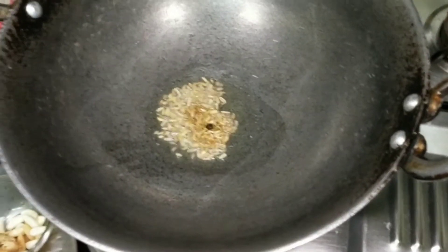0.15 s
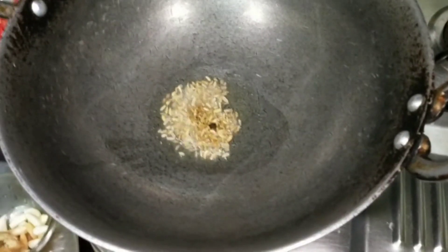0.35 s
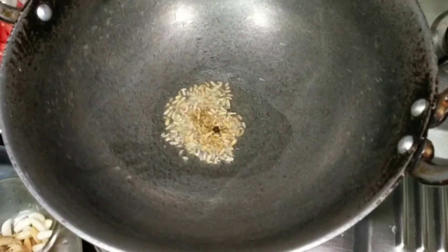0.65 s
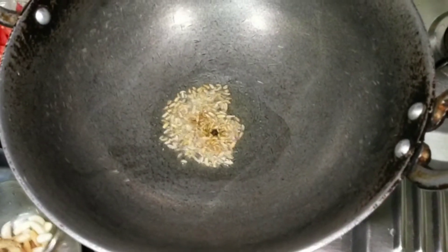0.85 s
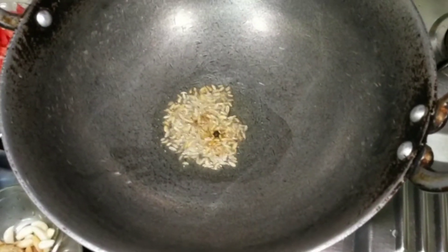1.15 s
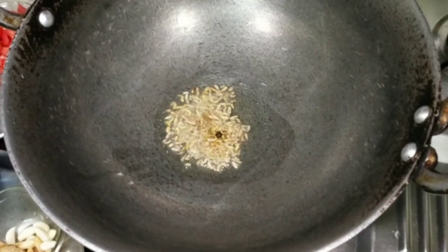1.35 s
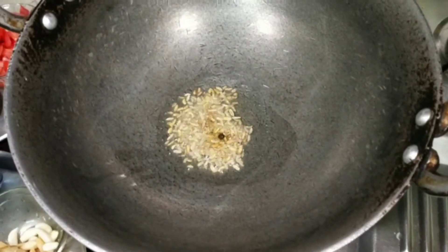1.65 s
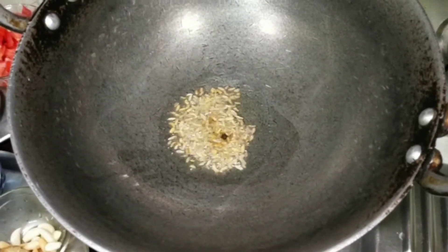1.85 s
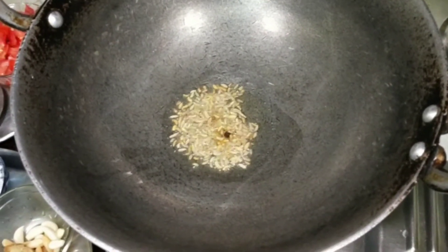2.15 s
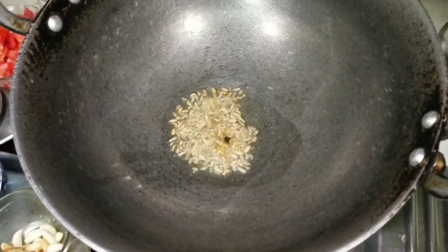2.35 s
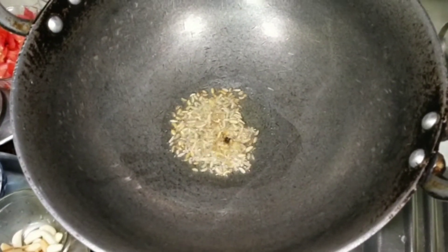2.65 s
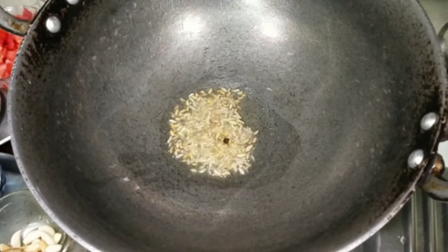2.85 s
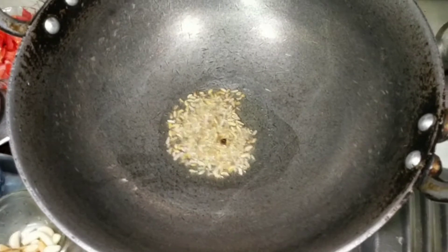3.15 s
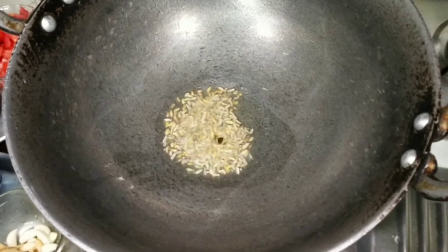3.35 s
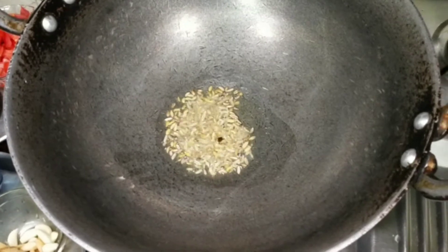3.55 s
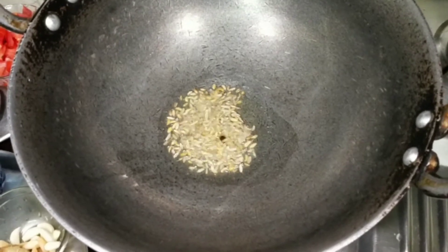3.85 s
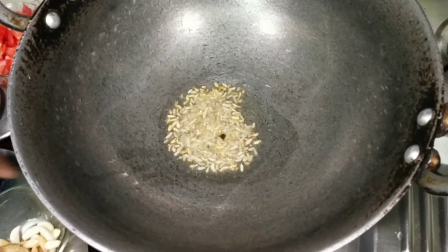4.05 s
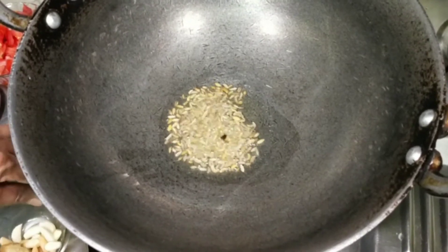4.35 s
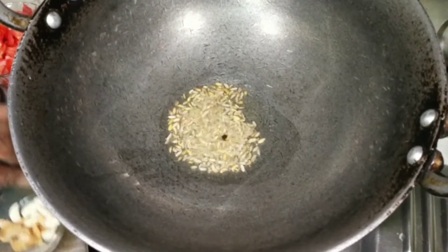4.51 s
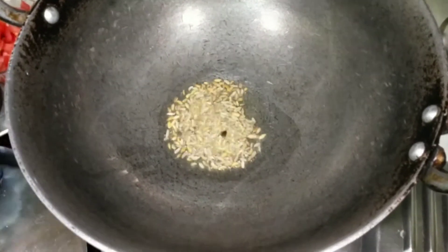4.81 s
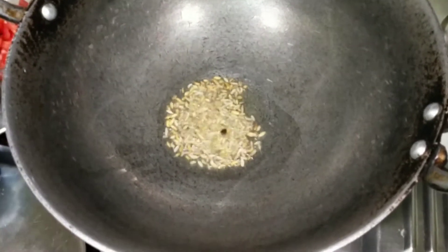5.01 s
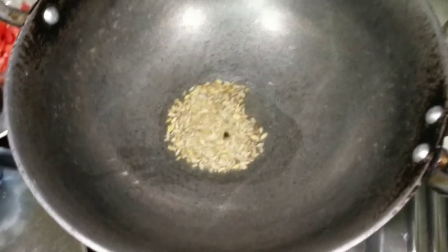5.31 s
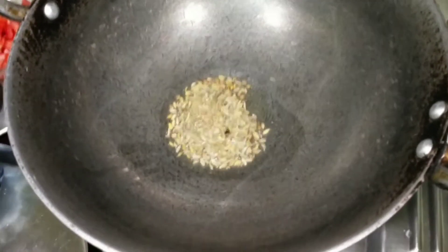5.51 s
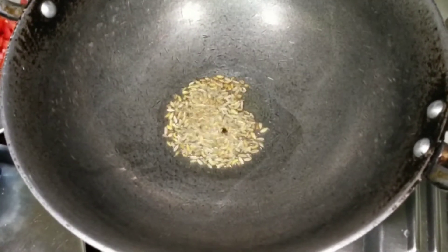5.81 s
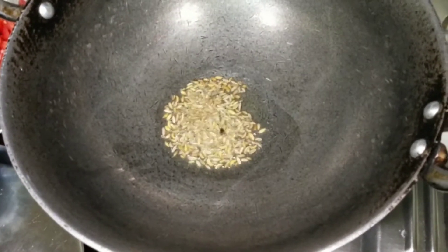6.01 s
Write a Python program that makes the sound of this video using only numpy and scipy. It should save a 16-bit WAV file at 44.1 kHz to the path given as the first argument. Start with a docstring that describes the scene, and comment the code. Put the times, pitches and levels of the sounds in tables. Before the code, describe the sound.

A small hard-walled kitchen, heard close in stereo, with very low room rumble and faint electric hum. Seeds in oil give a soft, dense, bright hiss for the whole six seconds, flickering slightly and growing very little. At 0 s a hard steel clank opens, with a brief rub, followed by plate and tray rattles and scrapes until about 0.6. Light spoon ticks come around 1.0 and 1.35; at 1.45 an oil bubble snaps sharply, much louder than the other tiny pops. A double fork tick falls at 1.74. Faint sliding leads to a strong pot clank at 2.4, then subdued scrapes and taps until 3.2. A small crisp tick sounds at 3.9, a ladle clatter at 4.3. At 5.1 a cup knocks and slides, with short hollow tugs, tray taps and a thin metallic scrape fading by 5.7, leaving the sizzle.

```python
"""Seeds in a wok, steelware beside it

Seeds sizzle faintly in hot oil: dense random clicks and filtered noise. Larger bubbles pop as single clicks.
Steel utensils and bowls knock (noise bursts over decaying modes), slide (clustered clicks that ring
the modes) and are dragged in tugs (noise through a sinking cavity resonance).
A low electric hum and a room rumble lie under it all in a small, hard-walled kitchen."""
import sys
import numpy as np
from scipy import signal
from scipy.fft import rfft, irfft
from scipy.io import wavfile
from scipy.ndimage import map_coordinates

SR = 44100
rng = np.random.default_rng(int(sys.argv[2]) if len(sys.argv) > 2 else 0)


def wrap_up_sound(samples):
    """Save the sound to the file named by the first command line argument, as 16-bit audio."""
    columns = np.atleast_2d(samples).T
    # keep every value between -1 and 1, then stretch to whole-number steps
    tamed = np.clip(columns, -1, 1)
    steps = np.round(tamed * 32767).astype(np.int16)
    wavfile.write(sys.argv[1], SR, steps)


N = 272097  # length in samples

# colour of the frying oil: [f/Hz, density/dB per Hz]
SIZZLE_COLOUR = [(800, -51), (1400, -23), (1850, -24), (2250, -9.5), (2750, -8), (3500, -6.5), (4100, -10),
                 (4900, 0.5), (5600, 1.5), (6500, -5), (7700, -15.5), (12000, -19), (15000, -10),
                 (15650, -8), (16000, -39)]
# place of the frying, slightly right and then left: [t/s, left minus right/dB]
SIZZLE_PAN = [(0, -0.3), (3.5, -1.4), (4.6, 0), (6.2, 1)]
# bubbles that pop in the oil: [t/s, snap level/dB, top treble/dB, left minus right/dB]
POPS = [(.8102, -44.5, -2, 6), (1.1533, -44.5, -8, -1), (1.4492, -22.5, 21, -2), (2.0134, -46, -5, -1),
        (3.383, -52, 24, 0), (3.7932, -44, 0, 2), (4.7596, -45, 0, 8)]
# colour of a pop in the wok: [f/Hz, density/dB per Hz]
POP_COLOUR = [(300, -41), (700, -19), (1500, -17.5), (2700, -6), (4000, -10), (5600, 7.5), (7000, -7),
              (9000, -19), (12000, -22.5), (15300, -16)]
# pieces of kitchenware, by name: [left minus right/dB, modes as (f/Hz, level/dB, t60/s)]
PIECES = { "pot": (-1.1, [(636, -17, 0.11), (903, -22.5, 0.18), (1680, -10.5, 0.2), (1877, -1, 0.15),
          (2046, -6.5, .15), (2084, -3.5, 0.15), (2573, -10.5, 0.15), (2860, -7, 0.24), (3200, -18.5, 0.22),
          (5440, -11, .2), (5670, -17, .13), (5900, -8, 0.13)]), "plate": (-1.4, [(2110, -2.5, 0.12),
          (2197, -6.5, 0.23), (3456, -5, 0.14), (4730, -5, 0.28), (4798, -4, 0.17), (5030, -4.5, 0.16),
          (5021, -1.5, 0.18), (5100, -2, 0.25), (5329, -1.5, 0.13), (5755, -19, 0.23)]),
          "tray": (-1.5, [(1547, -0.5, .1), (1800, -2, 0.076), (1890, -5, 0.049), (2100, -11, 0.1),
          (2260, -16.5, .12)]), "bowl": (-1.1, [(1597, 2.5, 0.22), (5230, -4, .2)]),
          "lid": (0.91, [(1225, -21, 0.52), (1610, 0.5, 0.18), (2100, -4.5, 0.35), (3193, 1.5, 0.67),
          (3460, -4, 0.71)]), "tumbler": (-1.2, [(1467, -5, 0.14), (1635, -8, 0.21), (2005, -4, 0.29),
          (2330, -10.5, 0.11), (2742, -3.5, 0.11), (3210, -17.5, 0.206), (4950, -16, 0.19)]),
          "cup": (-1, [(1392, -7.5, 0.19), (1693, -4.5, 0.24), (3780, -11.5, 0.35), (4370, -15, 0.28),
          (4840, 1.5, 0.039), (5840, -25, 0.23)]), "ladle": (-0.68, [(2050, -12, 0.18), (2680, -7, 0.19),
          (3970, -6.5, 0.08), (5240, -12.5, 0.12), (6340, -5.5, 0.1), (7030, -6, 0.096)]),
          "spoon": (-1.77, [(2420, -20, .09), (2780, -7, 0.16), (4530, -16.5, 0.14), (5040, -15.5, .17),
          (5500, -5, 0.077), (5940, -7, .12)]), "fork": (-2, [(2480, -17, .09), (2830, -5, 0.059),
          (4700, -20, 0.19), (5100, -5, 0.062), (5650, -5, 0.11)]), "counter": (19.5, [(201, -6, 0.21),
          (262, 2.5, 0.21), (319, -3.5, 0.29)])}
# broad colour of the steelware: [f/Hz, density/dB per Hz]
STEEL_COLOUR = [(50, -27.5), (150, -13.5), (300, -12), (600, -9.5), (1200, -6.5), (2100, -2), (3000, -8.5),
                (4000, -5.5), (5400, 5), (6400, -1.5), (7600, -11.5), (11000, -19), (13500, -16),
                (15300, -14.5)]
# knocks of one piece: [t/s, piece, level/dB, contact time/s, low edge/Hz, brightness/dB,
# top treble/dB, strength of the modes/dB]
KNOCKS = [(0.01, "pot", -29.5, 0.00037, 570, -1, -3, -11), (0.011, "pot", -31.5, 0.0034, 610, -19, 10, -17),
          (.128, "spoon", -50.5, .004, 1500, -5, -16, -16), (0.198, "plate", -41, 0.03, 616, -4, -9.5, -11),
          (0.353, "tray", -42.5, 0.0083, 1420, -11, 0, -1.5),
          (0.427, "plate", -43.5, .005, 650, 0.5, -1, -4), (.445, "plate", -32.5, 0.0053, 860, -1, -3, -6),
          (.463, "plate", -39.5, .0015, 1200, 3, -15, -1.5),
          (0.4875, "plate", -39.5, 0.0026, 1300, -3, -11, -6),
          (0.503, "tray", -43.5, 0.0019, 1400, -1, -14, -5),
          (.5285, "plate", -37.5, 0.00049, 800, 11.5, -19, -6.5),
          (0.97, "spoon", -47, 0.0088, 850, 4, -9, -25), (0.977, "bowl", -54.5, 0.003, 1200, -16, -5, 2),
          (1.123, "tray", -56.5, 0.005, 1300, 5, -15, -9),
          (1.152, "tumbler", -55, 0.0031, 1780, -32, 1, -18),
          (1.343, "spoon", -44.5, 0.005, 1270, -5, -3, -6), (1.357, "fork", -59, .003, 710, -17, -10, -17),
          (1.49, "spoon", -49.5, 0.0047, 1700, -14, 6, -19), (1.7349, "fork", -42, 0.0026, 720, -2, -5, -3),
          (1.7395, "fork", -40.5, 0.0011, 673, -12, 4.5, 1),
          (2.285, "bowl", -51.5, 0.0029, 1500, -2, -13, -13),
          (2.334, "spoon", -44.5, 0.017, 700, -4, 3.5, -6),
          (2.4096, "pot", -26.5, 0.0017, 560, -7.5, -17.5, -5),
          (2.4138, "pot", -30.5, 0.0053, 130, -5.5, 0.5, -1),
          (2.682, "tumbler", -60, 0.0035, 1000, 0, 12, -21),
          (2.832, "tumbler", -49, 0.039, 980, -15.5, 2, -5), (3.06, "tumbler", -58, 0.03, 1150, -24, 14, 0),
          (3.169, "spoon", -50.5, 0.023, 1145, 21, -3, -22),
          (3.8762, "spoon", -40.5, 0.00058, 3000, -12, -12.5, -13),
          (4.3, "ladle", -43, 0.018, 1290, -4, -4, -10), (4.311, "ladle", -39.5, 0.0077, 856, 0.5, 2, -0.5),
          (4.354, "ladle", -53, .005, 700, -7, -1, -15), (4.389, "ladle", -51.5, .002, 1110, -2, -3.5, -7),
          (5.1036, "cup", -36.5, 0.0085, 840, -4.5, -2, -3.5), (5.136, "cup", -49, .002, 800, -6, -11, -6),
          (5.11, "counter", -58, 0.065, 220, -20, -8, -7), (5.15, "cup", -45, 0.0034, 700, 4, -15, -22),
          (5.187, "tray", -37.5, 0.0045, 473, -4.5, -4.5, -15),
          (5.302, "tray", -49.5, 0.006, 746, -8, -8, -3),
          (5.379, "spoon", -45.5, 0.0062, 553, -2.5, -4, -23), (5.453, "lid", -54.5, .01, 890, 12, 5, -12)]
# steel sliding over steel: [start t/s, piece, length/s, level/dB, change along the stroke/dB,
# brightness/dB, low edge/Hz, strength of the modes/dB]
SLIDES = [(0, "tray", 0.0052, -29, -14.5, -13, 840, -19), (0.02, "pot", 0.1, -63, 0, -19, 950, -9),
          (0.17, "tray", 0.065, -49, -11, -6, 1010, 2.5), (0.37, "tray", 0.049, -42, -2.5, -4, 1260, -6.5),
          (0.43, "plate", 0.036, -35, -3.5, 7, 1130, -11), (0.481, "plate", 0.028, -40, 1.5, 6, 795, 0),
          (0.536, "plate", 0.025, -48, -3, 4, 418, 0), (1.092, "bowl", 0.11, -58.5, -10, -2, 1460, -19),
          (2.094, "tumbler", 0.28, -61, 7.5, -0.5, 1560, -9.5),
          (2.369, "pot", 0.044, -49, 17.5, -1, 450, -8), (2.554, "plate", 0.064, -47.5, 1, 1, 910, -12),
          (2.68, "tumbler", 0.091, -51.5, 4.5, 2.5, 950, -23),
          (2.854, "tumbler", 0.038, -50.5, -4, -6, 1260, 2.5),
          (2.935, "tumbler", 0.17, -53.5, 0.5, -5, 1110, -3.5),
          (3.162, "tumbler", 0.058, -51.5, -7, -2.5, 1140, -5),
          (4.326, "ladle", 0.078, -46.5, -11, -8, 1040, -7), (5.11, "cup", 0.081, -38.5, -6, -2.5, 625, -2),
          (5.258, "tray", 0.18, -52, -1, 1.5, 535, -23), (5.45, "lid", 0.25, -58, -1.5, 31, 1390, -8)]
# a hollow piece dragged in short tugs: [strongest pull t/s, cavity resonance f/Hz, rub level/dB,
# cavity note level/dB]
TUGS = [(.026, 750, -48.5, -60), (.141, 743, -53, -54), (5.2, 1107, -41.5, -38.5), (5.275, 910, -51, -62),
        (5.311, 895, -44, -48), (5.398, 593, -56, -54.5), (5.676, 1244, -87, -73.5)]
# room rumble of the kitchen: [f/Hz, density/dB per Hz]
RUMBLE_COLOUR = [(20, 0), (40, -8), (70, -3), (110, -9.5), (160, 2.5), (230, -12), (330, -6.5), (500, -14),
                 (900, -16.5), (1500, -16.5), (3000, -54)]
# lines of the electric hum: [f/Hz, level/dB]
HUM_LINES = [(100, -81), (122, -77.5)]
# likeness of left and right in diffuse sound: [f/Hz, correlation]
LIKENESS = [(25, 0.94), (110, 1), (290, 0.94), (640, 0.52), (1400, -0.45), (3100, 0.15), (5500, -0.29),
            (9000, -0.16), (15000, 1)]

# the frying grows slowly as the seeds heat up
SIZZLE_DB, HEATING_DB_PER_S = -56, 0.19
# room tail of a knock: early level after a typical contact, then the slow part relative to it
TAIL_DB, TAIL_T60, LATE_DB, LATE_T60 = -2.5, 0.13, -7.5, 0.42
# a contact longer than the typical one feeds the room more
TYPICAL_CONTACT_S = 0.0061
# a contact shorter than this is hard: its click stands out of the room tail
HARD_CONTACT_S = 0.001
# a knock rises with a time constant of this share of its contact time
ATTACK_SHARE = 0.15
# a mode flutters by this share, this many times while it dies: long rings stay clear
FLUTTER, FLUTTERS_PER_RING = 0.6, 9
# every stroke takes hold in the same time and dies away at the same speed
GRIP_S, LET_GO_S, DYING_DB_PER_S = 0.0024, 0.3, 190
# a tug swells and fades while its resonance sinks; the cavity rings on a little
SWELL_S, FADE_S, SAG_OCTAVES_PER_S, CAVITY_T60 = 0.025, 0.024, 2, 0.14
NOTE_RISE_S = 0.00675  # build-up of the cavity's note
EDGE_HZ = 16200  # upper band limit of the whole mix


def sizzle():
    """Tiny steam bubbles burst around the seeds and blur into a hiss in the bowl of the wok."""
    bursts = grains(N, per_s=2700, spread_db=-1.0)
    bubbles = evened(kitchen(bursts, wet_db=23.0, t60=0.027))
    blur = amp(2.5) * diffuse(N)
    hiss = coloured(bubbles + blur, lambda hz: amp(read(SIZZLE_COLOUR, hz)))
    fizz = evened(coloured(hiss, lambda hz: amp(ripple_db(hz, spacing_hz=90))))
    # random peaks and dips drift through the hiss, so its colour flickers
    fizz = evened(shifting(fizz, depth_db=3.0, spacing_hz=168.5, per_s=16))
    fizz = evened(shifting(fizz, depth_db=1.1, spacing_hz=1100, per_s=7))
    t = np.arange(N) / SR
    level_db = SIZZLE_DB + HEATING_DB_PER_S * t + 0.33 * wander(N, per_s=5.7)
    pan_db = np.interp(t, *np.transpose(SIZZLE_PAN))
    return placed(fizz * amp(level_db), pan_db)


def pop(level_db, top_db, pan_db):
    """A larger bubble bursts with one sharp click; the wok throws it back as a decaying echo."""
    t = np.arange(SR // 4) / SR
    snap = np.zeros((2, len(t)))
    snap[:, 0] = 1
    near = amp(-16) * np.exp(-t / 0.0015)
    middle = amp(-28) * amp(-60 * t / 0.06)
    late = amp(-33) * amp(-60 * t / 0.25)
    echo = diffuse(len(t)) * (near + middle + late)

    def colour(hz):
        return amp(read(POP_COLOUR, hz) + top_db * above(hz, 10200, order=8))

    sound = coloured(placed(snap, pan_db) + echo, colour)
    head = SR // 500  # the level is that of the first 2 ms
    return amp(level_db) * sound / sound[:, :head].std()


def knock(piece, level_db, contact_s, low_hz, bright_db, top_db, ring_db):
    """A chatter of contact, weak in bass below its own low edge, its room tail, and the struck modes."""
    pan_db, modes = PIECES[piece]
    t = np.arange(SR // 2) / SR
    contact_s = max(contact_s, 3e-4)
    rise = 1 - np.exp(-t / (ATTACK_SHARE * contact_s))
    chatter = max(HARD_CONTACT_S / contact_s, 1) * amp(2.1 * wander(len(t), per_s=350))
    contact = chatter * np.exp(-t / contact_s)
    tail = amp(TAIL_DB) * (amp(-60 * t / TAIL_T60) + amp(LATE_DB - 60 * t / LATE_T60))
    room = tail * np.sqrt(contact_s / TYPICAL_CONTACT_S)
    envelope = np.hypot(contact, room) * rise

    def colour(hz):
        shelves_db = bright_db * above(hz, 3700, order=8) + top_db * above(hz, 6540, order=8)
        crowd_db = 3.2 * ripple_db(hz, spacing_hz=85)
        bass_cut = above(hz, low_hz, order=5) + 0.014
        return amp(read(STEEL_COLOUR, hz) + shelves_db + crowd_db) * bass_cut

    clack = coloured(diffuse(len(t)) * envelope, colour)
    head = SR // 25  # the level is that of the clack's first 40 ms
    clack = clack / clack[:, :head].std()
    ring = rise * sum(amp(db + ring_db) * ringing(t, hz, t60) for hz, db, t60 in modes)
    return placed(amp(level_db) * (clack + ring), pan_db)


def slide(piece, length_s, level_db, change_db, bright_db, low_hz, ring_db):
    """Steel catches and slips in many small clicks that ring the modes of the sliding piece."""
    pan_db, modes = PIECES[piece]
    t = np.arange(0, length_s + LET_GO_S, 1 / SR)
    # the slips come in clusters
    catches = amp(2.2 * wander(len(t), per_s=220))
    clicks = grains(len(t), per_s=1400, spread_db=1.8) * catches
    slips = evened(kitchen(clicks, wet_db=3, t60=0.12))
    scrape = coloured(slips, lambda hz: amp(read(STEEL_COLOUR, hz)) * (above(hz, low_hz, order=7) + 0.0084))
    # the colour shifts as the point of contact moves
    scrape = shifting(scrape, depth_db=2.6, spacing_hz=160, per_s=22)
    dull = evened(coloured(scrape, lambda hz: 1 - above(hz, 3360, order=6)))
    keen = evened(coloured(scrape, lambda hz: above(hz, 3100, order=6) * amp(6.9 * above(hz, 8000, order=6))))
    bright = amp(bright_db)  # keen part against dull part
    rub = (dull + bright * keen) / np.hypot(1, bright)
    # the hand presses unevenly, then lets go
    pressure_db = change_db * np.minimum(t / length_s, 1) + 1.4 * wander(len(t), per_s=29)
    dying_db = DYING_DB_PER_S * np.maximum(t - length_s, 0)
    envelope = np.minimum(t / GRIP_S, 1) * amp(level_db + pressure_db - dying_db)
    body = sum(amp(db) * ringing(t, hz, t60) for hz, db, t60 in modes)
    body = body / np.linalg.norm(body[0])
    ring = signal.fftconvolve(slips * envelope, body, axes=1)[:, :len(t)]
    return placed(envelope * rub + amp(ring_db) * ring, pan_db)


def drag(s, cavity_hz, rub_db, note_db, width_hz=420):
    """Uneven friction rings the cavity of a hollow piece in one tug; returns start time and sound."""
    t = np.arange(-SR // 16, SR // 4) / SR  # zero at the strongest pull
    hz = cavity_hz * 2 ** (-SAG_OCTAVES_PER_S * t)
    turn = np.exp(2j * np.pi * np.cumsum(hz) / SR)
    r = np.exp(-np.pi * width_hz / SR)
    # the moving resonance is shifted to zero, smoothed twice and shifted back
    rub = diffuse(len(t)) * amp(2.5 * wander(len(t), per_s=260)) / turn
    for _ in range(2):
        rub = signal.lfilter([1 - r], [1, -r], rub)
    rasp = coloured((rub * turn).real, lambda f: above(f, 0.73 * cavity_hz, order=7))
    swell = np.exp(np.minimum(t, 0) / SWELL_S)
    fade = np.exp(-np.maximum(t, 0) / FADE_S)
    sound = amp(rub_db) * evened(rasp) * swell * fade
    # the cavity's own steady note builds up just before the strongest pull
    age = t - t[0]
    note = ringing(age, cavity_hz, CAVITY_T60) * np.minimum(age / NOTE_RISE_S, 1)
    add(sound, -t[0] - NOTE_RISE_S, amp(note_db) * note)
    return s + t[0], sound


def background():
    """Low room rumble from filtered noise, and an electric hum of sines that waver in level and phase."""
    t = np.arange(N) / SR
    rumble = amp(-77.0) * evened(coloured(diffuse(N), lambda hz: amp(read(RUMBLE_COLOUR, hz))))
    hum = np.zeros(N)
    for hz, db in HUM_LINES:
        level = amp(db + 2 * wander(N, per_s=3.6))
        phase = 2 * np.pi * hz * t + 0.42 * wander(N, per_s=3.2)
        hum += level * np.sin(phase)
    return rumble + np.sqrt(2) * hum  # from rms to peak


def kitchen(x, wet_db, t60):
    """Direct sound plus a short dense tail from the pan and the walls."""
    t = np.arange(SR // 3) / SR
    tail = diffuse(len(t)) * amp(-60 * t / t60)
    tail *= amp(wet_db) / np.linalg.norm(tail[0])
    return x + signal.fftconvolve(x, tail, axes=1)[:, :x.shape[1]]


def grains(count, per_s, spread_db):
    """Sparse random clicks of scattered size, each with its own strength in left and right."""
    size = amp(spread_db * np.minimum(rng.exponential(1, count), 5))
    struck = rng.random(count) < per_s / SR
    return evened(size * struck * rng.standard_normal((2, count)))


def ringing(t, hz, t60):
    """One dying mode; rattling and reflections make it flutter, differently in each channel."""
    per_s = FLUTTERS_PER_RING / t60
    flutter = np.array([1 + FLUTTER * (wander(len(t), per_s) + 1j * wander(len(t), per_s)) for _ in range(2)])
    turns = hz * t + rng.random() + np.array([[0], [1 / 4]])  # right a quarter turn ahead
    ring = (flutter * np.exp(2j * np.pi * turns)).real * amp(-60 * t / t60)
    return ring / ring[:, :SR // 25].std()  # unit level over the first 40 ms


def diffuse(count):
    """Stereo white noise whose left and right are correlated by frequency as LIKENESS says."""
    a, b = rfft(rng.standard_normal((2, count)))
    same = np.clip(read(LIKENESS, np.fft.rfftfreq(count, 1 / SR)), -1, 1)
    return irfft(np.array([a, same * a + np.sqrt(1 - same ** 2) * b]), count)


def wander(count, per_s):
    """Smooth chance of about unit size that changes about per_s times a second."""
    knots = rng.standard_normal(2048)
    return map_coordinates(knots, [np.arange(count) * per_s / SR], order=3, mode="wrap")


def ripple_db(hz, spacing_hz):
    """Chance peaks and dips of about unit size, as from many crowded resonances."""
    return map_coordinates(rng.standard_normal(1024), [hz / spacing_hz], order=3, mode="wrap")


def shifting(x, depth_db, spacing_hz, per_s):
    """Lets chance peaks and dips, about spacing_hz apart, come and go per_s times a second."""
    hz, t, z = signal.stft(x, SR, nperseg=1024)
    place = np.meshgrid(hz / spacing_hz, t * per_s, indexing="ij")
    patches = map_coordinates(rng.standard_normal((256, 256)), place, order=3, mode="wrap")
    return signal.istft(z * amp(depth_db * patches), SR, nperseg=1024)[1][:, :x.shape[1]]


def coloured(x, gain, size=4096):
    """Causal (minimum-phase) filter whose magnitude is the function gain(Hz)."""
    log_gain = np.log(np.maximum(gain(abs(np.fft.fftfreq(size, 1 / SR))), 1e-5))
    taps = np.fft.ifft(np.exp(np.conj(signal.hilbert(log_gain)))).real[:size // 2]
    return signal.fftconvolve(x, taps[None], axes=1)[:, :x.shape[1]]


def above(hz, edge_hz, order):
    """A smooth step from 0 below the edge to 1 above it."""
    return 1 / (1 + (edge_hz / (hz + 1)) ** order)


def read(points, hz):
    """Reads a table on a log-frequency axis."""
    f, value = np.transpose(points)
    return np.interp(np.log(hz + 1), np.log(f), value)


def amp(db):
    """Decibels to gain."""
    return 10 ** (np.asarray(db) / 20)


def evened(x):
    """Scales to an rms of one."""
    return x / np.sqrt(np.mean(x ** 2) + 1e-20)


def placed(x, pan_db):
    """Raises the left over the right by pan_db."""
    return x * amp(np.array([[1], [-1]]) * pan_db / 2)


def add(mix, s, sound):
    """Adds a stereo sound to the mix at time s, or at the very start if s is negative."""
    part = mix[:, max(round(s * SR), 0):][:, :sound.shape[1]]
    part += sound[:, :part.shape[1]]


def scene():
    """The wok near the middle, most of the kitchenware a little to the right."""
    mix = sizzle() + background()
    for s, *burst in POPS:
        add(mix, s, pop(*burst))
    for s, *blow in KNOCKS:
        add(mix, s, knock(*blow))
    for s, *stroke in SLIDES:
        add(mix, s, slide(*stroke))
    for tug in TUGS:
        add(mix, *drag(*tug))
    return mix


def record(dry):
    """Limits the band with a steep low-pass at EDGE_HZ."""
    taps = signal.firwin(511, EDGE_HZ, window=("kaiser", 9), fs=SR)
    return signal.oaconvolve(dry, taps[None], "same")


dry = scene()
out = record(dry)
wrap_up_sound(out)
```